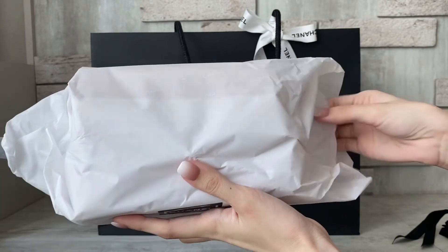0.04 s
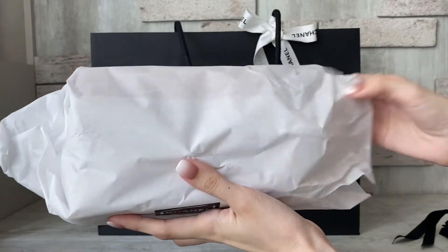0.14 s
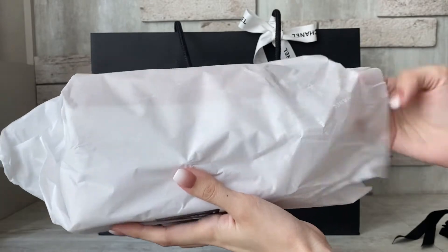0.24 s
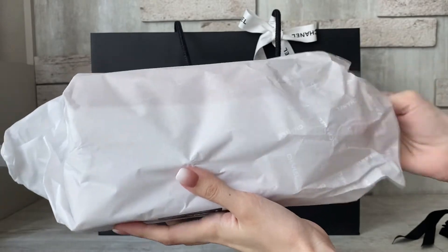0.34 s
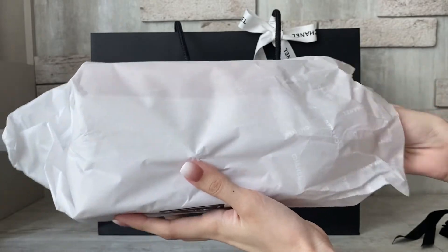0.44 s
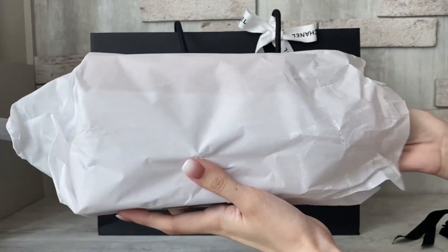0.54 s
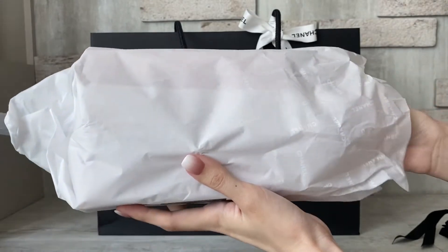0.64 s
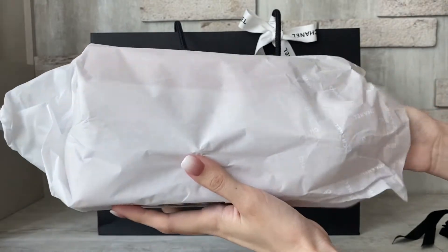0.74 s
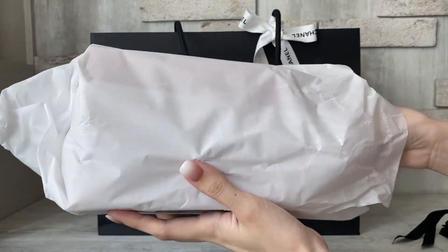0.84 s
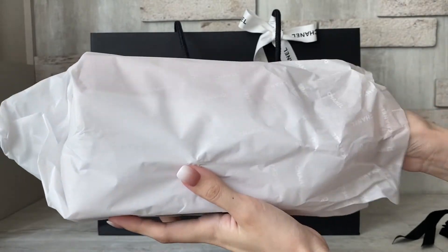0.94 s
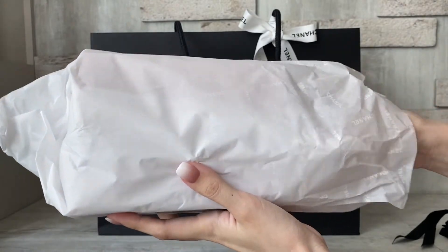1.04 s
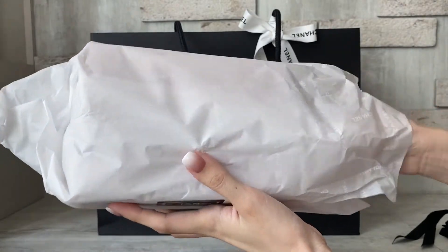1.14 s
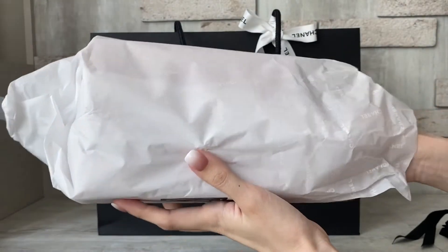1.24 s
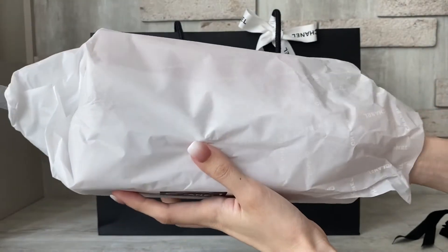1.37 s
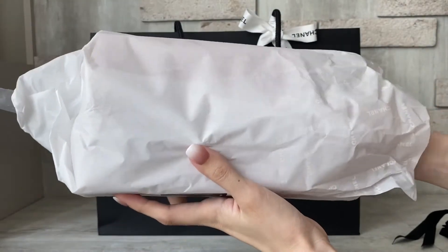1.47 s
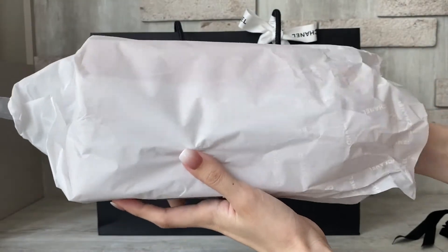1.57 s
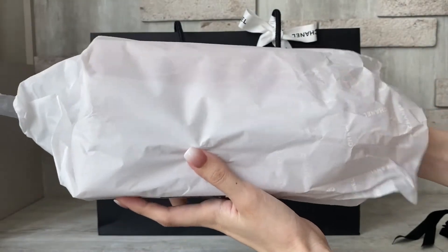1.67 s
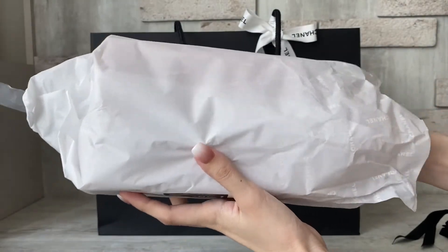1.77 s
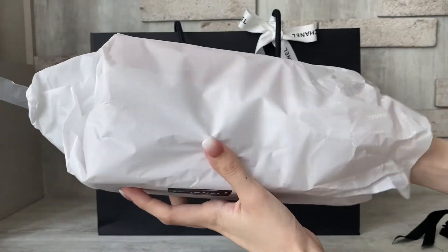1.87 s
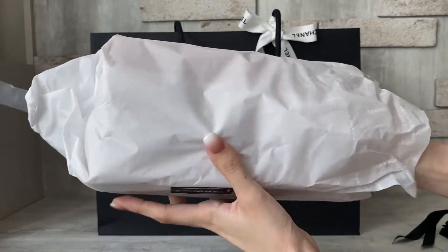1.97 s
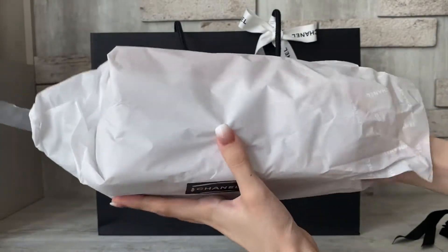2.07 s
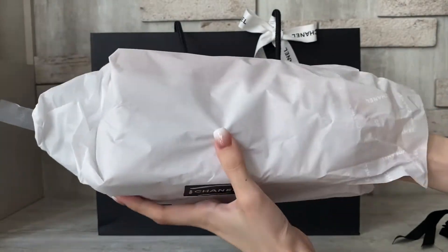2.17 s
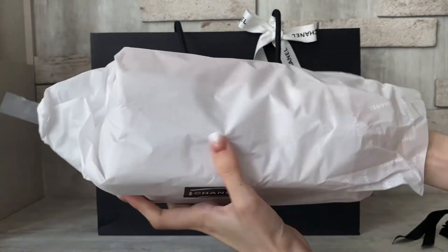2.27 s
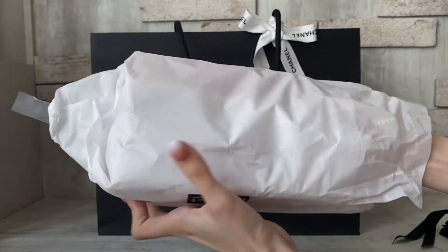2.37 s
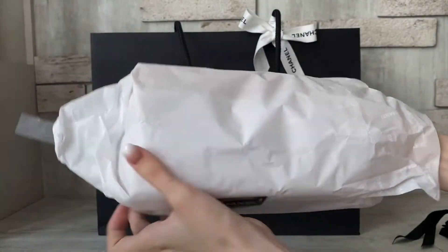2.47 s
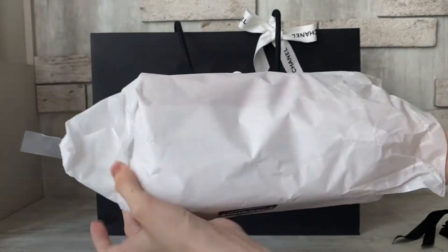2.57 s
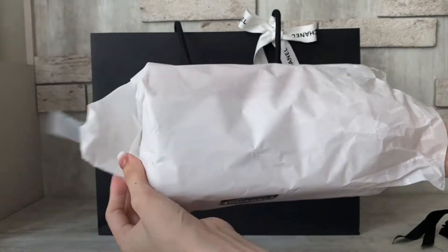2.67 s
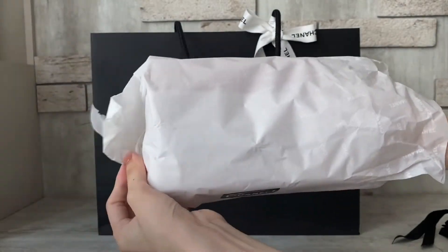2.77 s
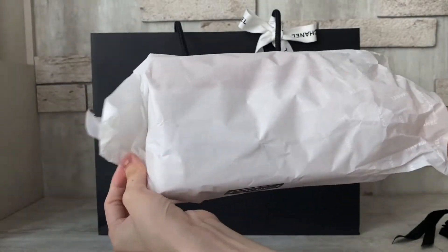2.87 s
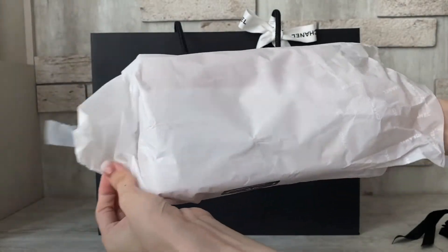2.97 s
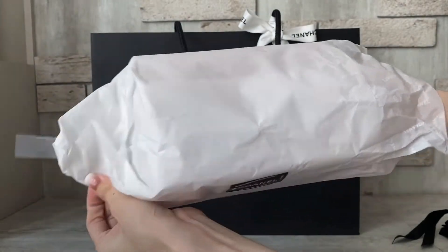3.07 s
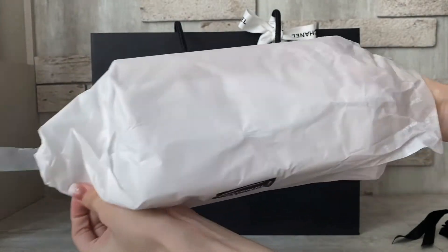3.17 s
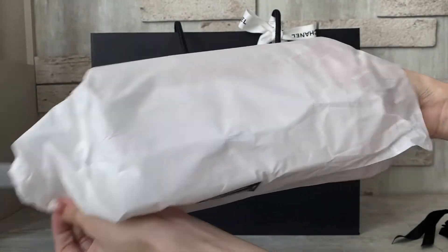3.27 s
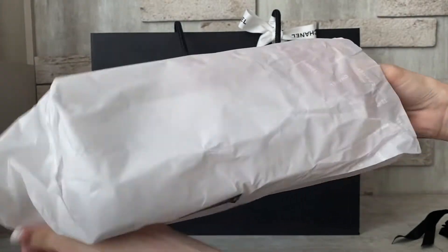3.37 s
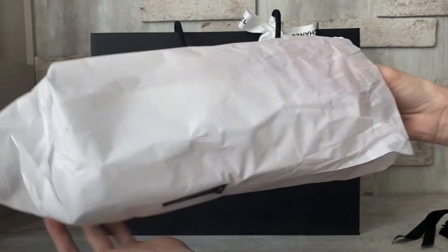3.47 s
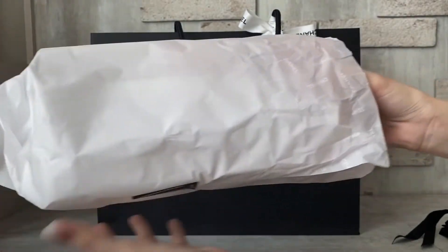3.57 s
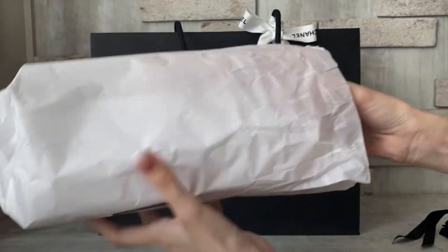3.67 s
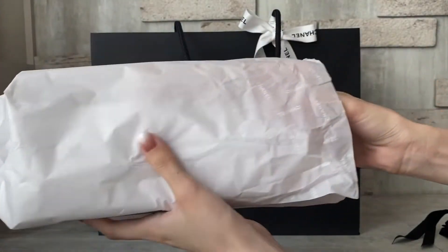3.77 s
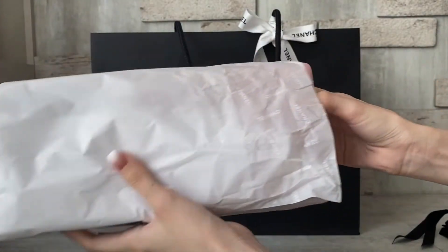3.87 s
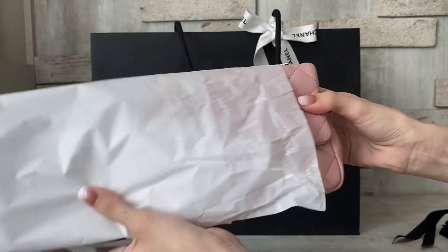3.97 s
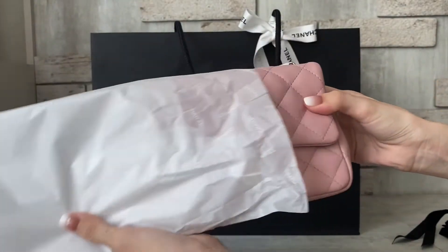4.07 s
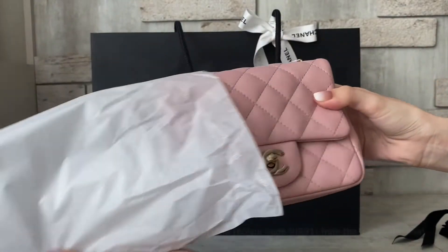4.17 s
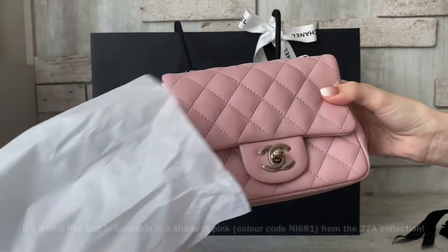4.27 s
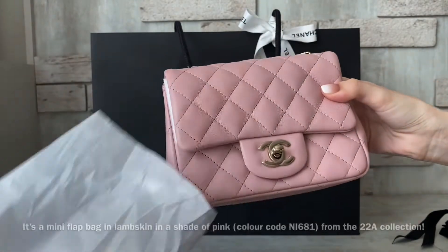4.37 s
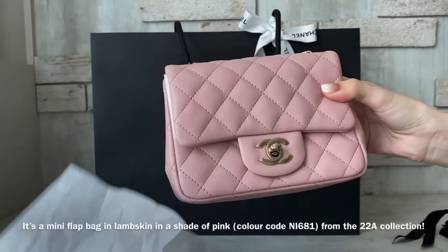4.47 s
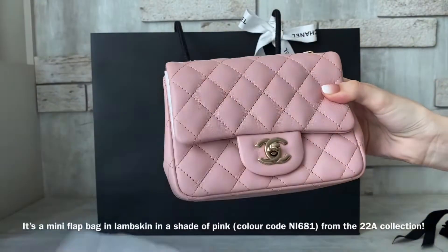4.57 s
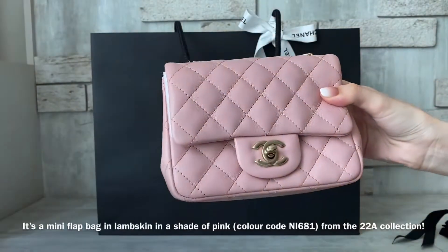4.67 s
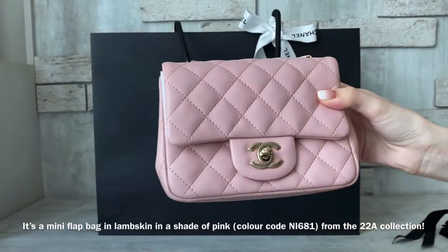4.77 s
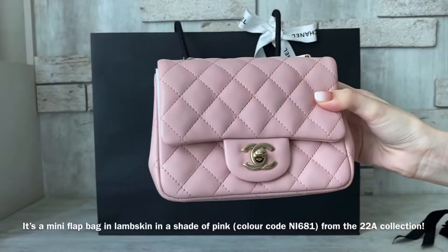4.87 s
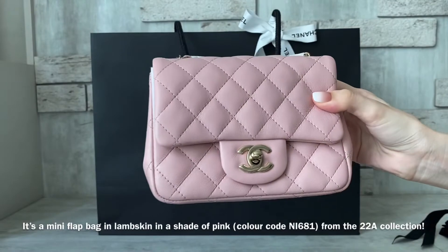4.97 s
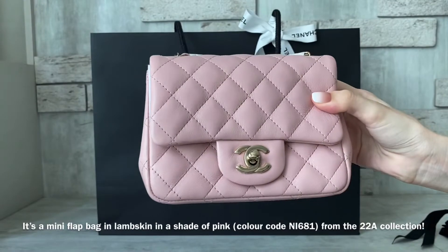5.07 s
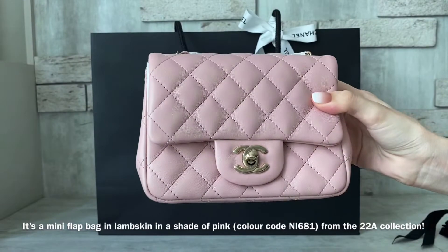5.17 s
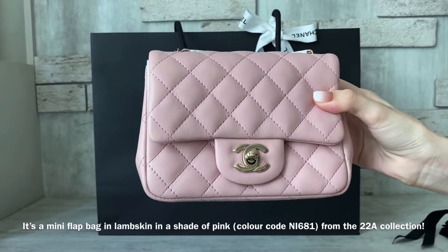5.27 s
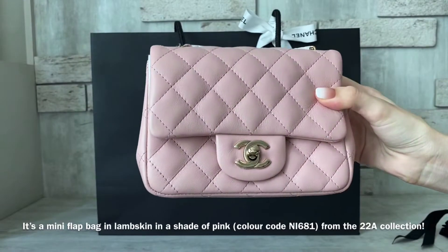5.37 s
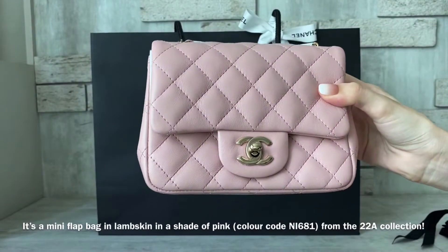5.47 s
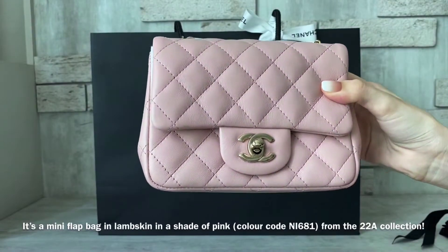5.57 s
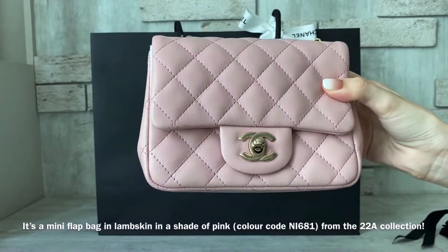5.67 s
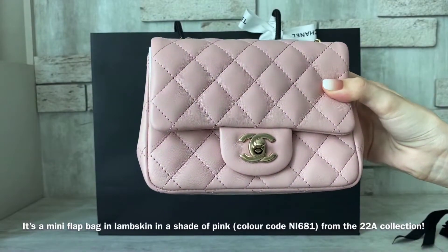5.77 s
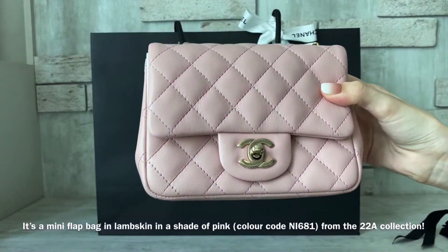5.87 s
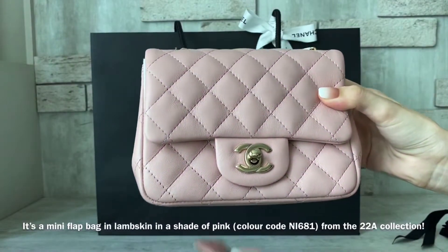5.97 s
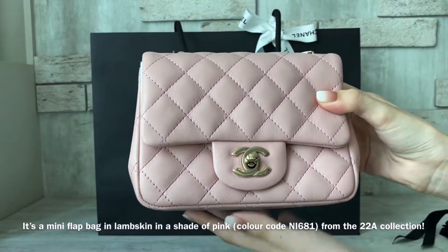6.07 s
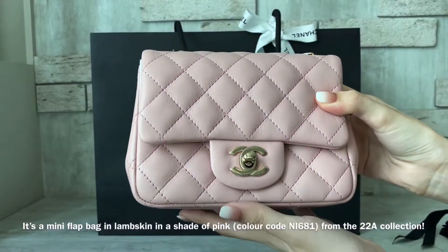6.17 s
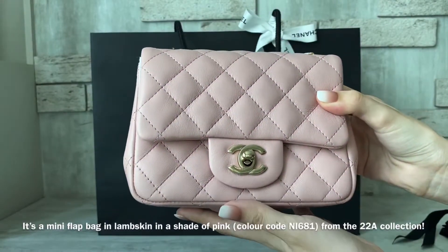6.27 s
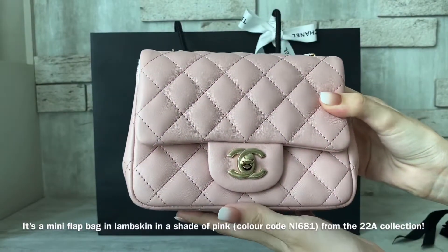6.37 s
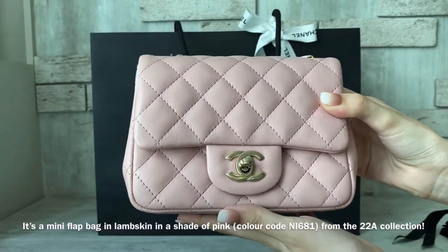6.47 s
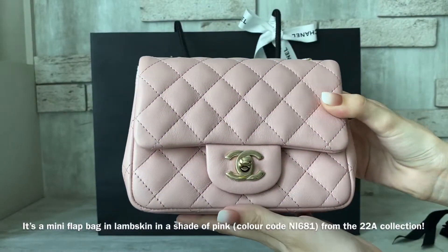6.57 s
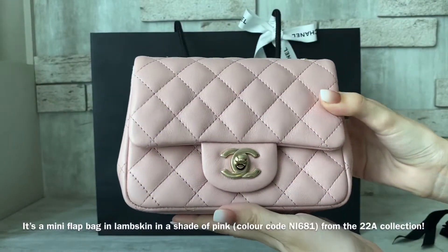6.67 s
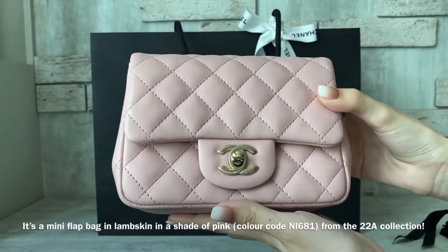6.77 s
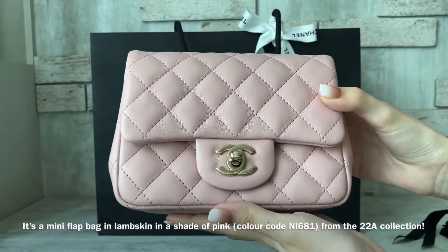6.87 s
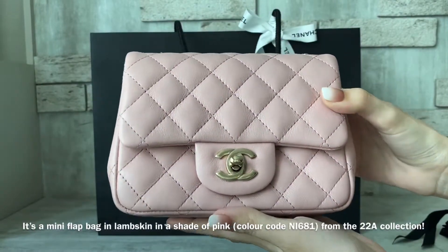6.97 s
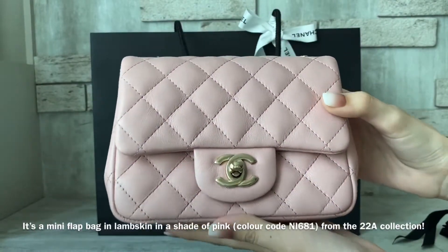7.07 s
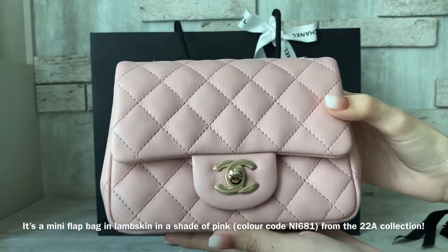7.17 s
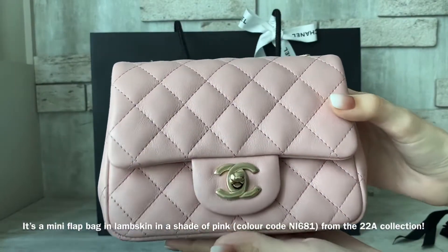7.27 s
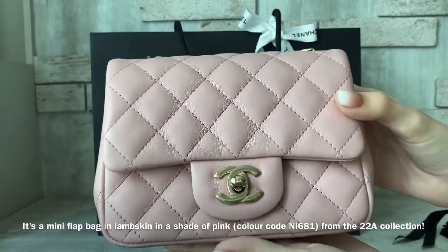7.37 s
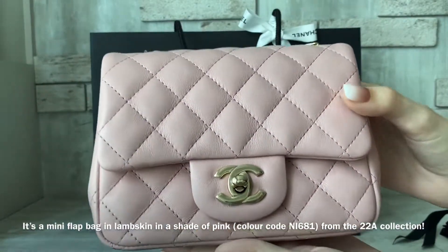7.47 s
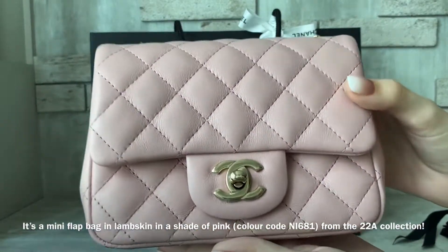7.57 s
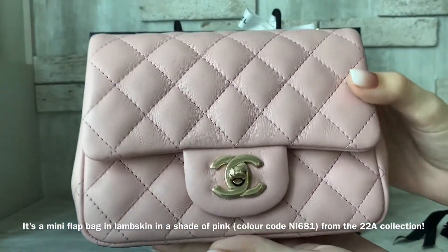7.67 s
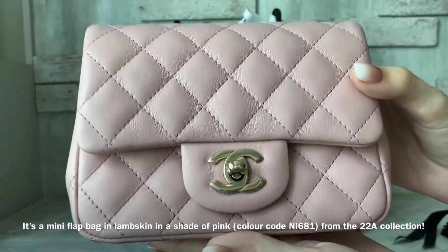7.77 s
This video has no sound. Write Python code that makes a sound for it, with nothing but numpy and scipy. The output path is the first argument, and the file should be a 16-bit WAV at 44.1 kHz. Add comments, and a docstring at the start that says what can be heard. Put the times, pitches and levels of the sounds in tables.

```python
"""Tissue paper crackles as a handbag is slid out of its sleeve, close to the microphones in a small room.
Creases are swarms of tiny clicks passed through paper colours; the hollow sleeve rubs and flutters in filtered noise.
The paper is put down, then come faint ticks and one click of the bag's fittings, made of ringing modes.
Underneath lie a low room rumble of coloured noise and a faint, wavering sine hum."""
import sys
import numpy as np
from scipy import signal
from scipy.fft import rfft, irfft
from scipy.io import wavfile
from scipy.ndimage import uniform_filter1d

SR = 44100
rng = np.random.default_rng(int(sys.argv[2]) if len(sys.argv) > 2 else 0)


def to_wav(sig):
    """Store sig (one row per channel, or 1-D mono) as 16-bit WAV at the path in sys.argv[1].

    Samples outside -1..1 are clipped; the rate is SR.
    """
    pcm = np.clip(np.atleast_2d(sig), -1, 1) * 32767
    pcm = np.round(pcm).astype(np.int16)
    wavfile.write(sys.argv[1], SR, pcm.T)  # frames by channels


N = 345303
TIME = np.arange(N) / SR
BAND_EDGES = np.geomspace(120, 17000, 16)  # Hz

# Pulls on the paper: start_s, length_s, crackle_db (before layer trims), swell_db (rise over the pull),
# rub_db (sleeve relative to crackle)
PULLS = [(0.045, 0.11, -37, 13, -5), (0.22, 0.045, -39.5, 0, -5), (0.575, 0.092, -41.5, 10, -5),
         (0.728, 0.047, -37, 0, -5), (0.852, 0.15, -38.5, -3, -2.5), (1.062, 0.32, -41, 1, -3.5),
         (1.435, 0.05, -39.5, 2, -3), (1.645, 0.11, -49.5, 7, -0.5), (1.8, 0.07, -35.5, 0, -5.5),
         (1.955, 0.2, -44, -10, -3), (2.232, 0.033, -40, 0, -4), (2.33, 0.14, -45.5, 2, -3),
         (2.535, 0.21, -42.5, 4, -5.3), (2.858, 0.37, -37, 1, -3.5), (3.245, 0.052, -34, 1, -2),
         (3.345, 0.028, -37.5, -3, -0.7), (3.655, 0.105, -42, -1, -2), (3.825, 0.2, -38.5, 4, -2.5),
         (4.05, 0.32, -43, -8, -3.6), (4.47, 0.08, -57, 0.5, -3.5), (4.649, 0.094, -62, 2.5, 0.5),
         (5.035, 0.09, -60, -3.5, -6), (5.227, 0.04, -54, 0, 2), (5.372, 0.035, -52, 0, -0.5),
         (5.535, 0.014, -51.5, 0, 2.5), (5.595, 0.046, -61, 0.5, -4)]
# How the sheet is held: time_s, billow_db (air flutter, before trim), brightness_db_per_octave (of the creases)
SHEET_HOLD = [(0, 4, 0.5), (1.3, -0.5, -1), (2.3, 0, -2), (3.3, -3, 0), (3.75, -1.5, 1.5), (4.3, 0.5, 0.5),
              (4.8, -1, -2.8)]
# Single creases giving way: start_s, level_db (dry, over 5 ms), brightness_db_per_octave
SNAPS = [(0.0052, -36.5, -0.5), (0.022, -41, 1.5), (0.0558, -30, 1), (0.0988, -29, 1), (0.16, -30.5, 3),
         (0.2204, -30, 2), (0.2672, -39, 11), (0.368, -44.5, 0), (0.4615, -42, -1.5), (0.5644, -48, 1),
         (0.7427, -35, -2.5), (0.8496, -32.5, 3), (0.9443, -28, -2.5), (1.0054, -34, -5),
         (1.2022, -33.5, 0.5), (1.3697, -33, -1.5), (1.565, -44.5, -1), (1.6466, -41, -1),
         (1.6846, -32.5, -0.5), (1.7111, -38, 5.5), (1.7506, -35.5, -0.5), (2.0061, -35, 3),
         (2.1625, -42, 2), (2.4588, -31.5, 8), (2.512, -37.5, -1.5), (2.5944, -35, 6.5), (2.7933, -33.5, 3),
         (2.8241, -35.5, 1.5), (2.961, -31, 1.5), (3.032, -36, 11), (3.569, -46.5, 2.5), (3.6597, -37, -3),
         (3.8054, -37, -1), (3.961, -34.5, -3.5), (4.284, -33, 18), (4.4775, -50, 1), (4.5227, -42.5, -1),
         (4.733, -47, 1), (4.8915, -58, -4), (4.951, -54, 2), (4.993, -48, 1), (5.0327, -49.5, -3.5),
         (5.37, -52, -0.5), (5.412, -46.5, 9), (5.921, -55.5, -3), (5.937, -62, 6), (6.2162, -60.5, -3.5),
         (6.25, -67, 1), (6.5219, -59, -8), (6.6323, -65.5, -6)]
# Contacts of the fitting's click: start_s, level_db (drive into its modes)
CLICK_CONTACTS = [(6.7033, -35), (6.7058, -43)]
# Ringing modes of the fitting: pitch_hz, level_db (relative), t60_s
FITTING_MODES = [(347, -15.5, 0.036), (606, -7.5, .02), (958, -11, 0.027), (1244, -10.5, 0.023),
                 (1790, 1, 0.011), (2430, -4.5, 0.0065), (3800, -11, .006), (4700, -10.5, 0.0054),
                 (6900, -18.5, .005), (10800, -12, 0.0018)]
# Stereo position, led by the paper: time_s, left_minus_right_db
STEREO_POSITION = [(0, -2), (2, -1), (4.2, 1.3), (5.5, -1)]

# Colour of buckling creases: frequency_hz, density_db (relative, per Hz)
CRACKLE_COLOUR = [(200, -22), (900, -8), (2000, -4.5), (3200, -1), (4500, 0), (5500, -3.5), (7200, 0),
                  (11800, 0), (14000, -2.5), (16000, -11)]
# Colour of the rubbing sleeve: frequency_hz, density_db (relative, per Hz)
SLEEVE_COLOUR = [(150, -18), (300, -15), (470, 0.5), (620, -3.5), (800, -1), (1000, -2.5), (1350, 1.5),
                 (1850, -4), (2500, -15), (4000, -17), (9000, -35.5)]
# Colour of the air pushed by the sheet: frequency_hz, density_db (relative, per Hz)
FLUTTER_COLOUR = [(30, -19), (55, -8), (75, -1), (120, -6), (180, -7), (280, -6), (450, -8), (900, -30)]
# Colour of the building's rumble: frequency_hz, density_db (relative, per Hz)
RUMBLE_COLOUR = [(15, -44), (25, -16.5), (37, -13.5), (59, -3), (88, -10.5), (131, -17.5), (243, -17),
                 (278, -18.5), (318, -25), (462, -21), (515, -25), (856, -30.5), (1000, -28.5), (2020, -48),
                 (15000, -69.5)]

# Sag of the hum near the end: time_s, pitch_hz (before wavering)
HUM_PITCH = [(6.5, 286.5), (7.1, 276)]
# Swells of the hum: start_s, length_s, level_db (before wavering and stereo weights)
HUM_SWELLS = [(3.45, 1.2, -64), (6.501, 0.17, -64.5), (7.002, 0.41, -64), (7.699, 0.13, -62.5)]
# Decay of the room: frequency_hz, t60_s
ROOM_DECAY = [(200, .5), (1000, 0.54), (4000, 0.57), (8000, 0.51), (15000, 0.42)]
# Left-right correlation of the stereo image: frequency_hz, likeness (no unit, limited to +-0.99 in use)
STEREO_LIKENESS = [(50, 1), (420, 0.63), (600, 0.14), (780, -0.44), (1200, 0.42), (2050, 0.7), (2650, 0.01),
                   (4800, .5), (6800, 0.48), (8400, -1.01), (10300, 0.68), (11400, 1.2), (12800, -0.87),
                   (13800, -1.53), (15200, 1.7)]
# Tonal balance of the stereo image: frequency_hz, left_minus_right_db
STEREO_BALANCE = [(100, 1.5), (430, 0), (950, 6), (1400, 3), (2300, -2), (3200, 4), (4500, 5), (6000, 1.5),
                  (8500, 0.5)]

# Every pull takes hold, lets go, and leaves the sheet settling faintly
GRIP_DB_PER_S, LET_GO_DB_PER_S = 700, 500
SETTLE_DB, SETTLE_DB_PER_S = -19, 85
# The paper sticks and slips during a pull
JERK_DB, JERKS_PER_S = 1.0, 28
# The sheet stirs faintly until it is put down (levels before layer trims)
STIR_CRACKLE_DB, STIR_RUB_DB, PUT_DOWN_S = -70, -65.5, 5.63
SNAP_HALF_RUN_S = 0.0036  # the last clicks of a snap come at up to twice this
RUMBLE_DB = -56.5
HUM_QUIET_DB, HUM_FADE_DB_PER_S = -76.5, 61
CUTOFF_HZ = 15900


def from_db(db):
    """Decibels to gain."""
    return 10 ** (np.asarray(db) / 20)


def rms_one(x):
    """Scale to unit power."""
    return x / np.sqrt(np.mean(x ** 2) + 1e-20)


def in_time(rows):
    """Each column of a curve, at every sample."""
    times, *columns = np.transpose(rows)
    return [np.interp(TIME, times, column) for column in columns]


def at_hz(points, hz):
    """Read a table on a log-frequency axis."""
    table_hz, values = np.transpose(points)
    return np.interp(np.log(hz + 1), np.log(table_hz), values)


def drift(rate):
    """A slow random wander of spread 1, with a new target rate times a second."""
    knots = rng.standard_normal(N // 20)
    return rms_one(np.interp(TIME * rate, np.arange(len(knots)), knots))


def held_db(start, length, attack_db_per_s, release_db_per_s):
    """Attack, hold and release as straight lines in dB, at 0 dB during the hold."""
    before_db = attack_db_per_s * np.maximum(start - TIME, 0)
    after_db = release_db_per_s * np.maximum(TIME - start - length, 0)
    return -np.minimum(before_db + after_db, 200)


def response(gain_at, size=4096):
    """The causal (minimum-phase) impulse response with a given gain per frequency."""
    hz = np.arange(size // 2 + 1) * SR / size
    cepstrum = irfft(np.log(gain_at(hz) + 1e-9))
    # folding the cepstrum forward puts the energy as early as it can be
    cepstrum[1:size // 2] *= 2
    cepstrum[size // 2 + 1:] = 0
    return irfft(np.exp(rfft(cepstrum)))


def through(x, impulse):
    """Pass a signal through an impulse response."""
    return signal.oaconvolve(np.atleast_2d(x), np.atleast_2d(impulse), axes=-1)[:, :N]


def coloured(x, spectrum):
    """Give a white signal a spectrum, keeping its power."""
    impulse = response(lambda hz: from_db(at_hz(spectrum, hz)))
    return through(x, impulse / np.linalg.norm(impulse))


def bands():
    """Band-passes about half an octave wide, with their centres in Hz."""
    edges = zip(BAND_EDGES, BAND_EDGES[1:])
    return [(np.sqrt(low * high), signal.butter(2, [low, high], "band", fs=SR, output="sos"))
            for low, high in edges]


def handling():
    """Drive in dB of crackle and rubbing: each pull swells or slackens in small jerks, then the sheet settles."""
    in_hand_db = held_db(0, PUT_DOWN_S, GRIP_DB_PER_S, LET_GO_DB_PER_S)
    crackle_db = STIR_CRACKLE_DB + in_hand_db
    rub_db = STIR_RUB_DB + in_hand_db
    for start, length, db, swell_db, relative_rub_db in PULLS:
        progress = np.clip((TIME - start) / length, 0, 1)
        pull_db = held_db(start, length, GRIP_DB_PER_S, LET_GO_DB_PER_S)
        settle_db = SETTLE_DB + held_db(start, length, GRIP_DB_PER_S, SETTLE_DB_PER_S)
        level_db = db + swell_db * (progress - .5) + np.maximum(pull_db, settle_db)
        crackle_db = np.maximum(crackle_db, level_db)
        rub_db = np.maximum(rub_db, level_db + relative_rub_db)
    jerks_db = JERK_DB * drift(JERKS_PER_S)
    return crackle_db + jerks_db, rub_db + jerks_db


def swarm(per_s, spread_db, clump_db, clumps_per_s, even_s):
    """Creases buckle in avalanches, many small and few large; unit power over the longer run."""
    sizes_db = spread_db * np.minimum(rng.exponential(1, N), 6) + clump_db * drift(clumps_per_s)
    clicks = from_db(sizes_db) * (rng.random(N) < per_s / SR)
    running_power = uniform_filter1d(clicks ** 2, int(even_s * SR) + 1)
    return clicks / np.sqrt(np.abs(running_power) + 1e-6)


def facets(clicks, colour_db, patchy_db, tilt_db=0):
    """Each click shakes a facet of paper with its own colour; the mix of facets shifts as the sheet bends."""
    at, out = np.flatnonzero(clicks), 0
    for hz, band in bands():
        kicks = np.full((2, N), 1e-18)
        own_db = colour_db * rng.standard_normal(len(at)) + patchy_db * drift(30)[at]
        own_colour = rms_one(from_db(own_db))
        kicks[:, at] = clicks[at] * own_colour * rng.choice([-1, 1], (2, len(at)))
        brightness = from_db(tilt_db * np.log2(hz / 7000))
        out = out + signal.sosfilt(band, kicks) * brightness
    return out


def taut_facets(clicks, t60, order=768):
    """A facet pulled taut rings for a moment at its own pitch, with the power of its click."""
    at, t, out = np.flatnonzero(clicks), TIME[:order], np.zeros((2, N + order))
    for start, (pitch, *phase) in zip(at, rng.random((len(at), 3))):
        hz = 900 + 13000 * pitch ** 1.3
        ping = np.sin(2 * np.pi * (hz * t + np.array(phase)[:, None]))
        ping = ping * from_db(-60 * t / t60)
        out[:, start:start + order] += clicks[start] * ping / np.linalg.norm(ping, axis=1, keepdims=True)
    return out[:, :N]


def crackle(crackle_db, bright_db):
    """Faster handling breaks more creases a second; a fine hiss of sliding fibres lies under them."""
    per_s = 1200 + 2200 * from_db(.6 * (crackle_db + 40))
    fine = swarm(per_s, spread_db=1.5, clump_db=2.0, clumps_per_s=300, even_s=0.046)
    # now and then a stiffer fold snaps out of the swarm
    folds = swarm(per_s / 30, spread_db=0.5, clump_db=6.0, clumps_per_s=18, even_s=0.072)
    creases = facets(fine + from_db(-8.0) * folds, colour_db=4.5, patchy_db=2.0, tilt_db=bright_db)
    taut = swarm(per_s / 12, spread_db=3.0, clump_db=1.5, clumps_per_s=60, even_s=0.11)
    pings = taut_facets(taut, t60=0.024)
    fibres = from_db(-15.0) * rng.standard_normal((2, N))
    mix = creases + from_db(-7.5) * pings + fibres
    return from_db(crackle_db - 1.2) * coloured(mix, CRACKLE_COLOUR)


def sleeve(rub_db, billow_db):
    """Larger panels of the hollow sleeve catch and slip on the leather, and the whole sheet pushes air."""
    catches = swarm(1500, spread_db=2.0, clump_db=2.5, clumps_per_s=120, even_s=0.064)
    slips = facets(catches, colour_db=3.0, patchy_db=2.0)
    air = from_db(billow_db - 5) * coloured(rng.standard_normal((2, N)), FLUTTER_COLOUR)
    return from_db(rub_db - 1.5) * (coloured(slips, SLEEVE_COLOUR) + air)


def background():
    """Low rumble of the building and the wavering hum of a far motor."""
    rumble = from_db(RUMBLE_DB) * coloured(rng.standard_normal((2, N)), RUMBLE_COLOUR)
    hz, = in_time(HUM_PITCH)
    swells_db = [db + held_db(start, length, HUM_FADE_DB_PER_S, HUM_FADE_DB_PER_S)
                 for start, length, db in HUM_SWELLS]
    hum_db = np.maximum(HUM_QUIET_DB, np.max(swells_db, axis=0))
    phase = 2 * np.pi * np.cumsum(hz + 2.57 * drift(12)) / SR
    hum = from_db(hum_db + 3.0 * drift(13)) * np.sin(phase)
    return rumble + hum * np.array([[1.3], [.3]])  # weights into mid and side


def snaps(shake_db, evenness, lead_s=.002, size=40, order=1024):
    """A crease gives way as a run of clicks that swells and fades, shaking the sleeve as well."""
    out = np.zeros((2, N + 2 * order))
    chances = rng.random((len(SNAPS), size))
    kicks = rng.choice([-1, 1], (len(SNAPS), 2, size))
    paper = lambda hz: from_db(at_hz(CRACKLE_COLOUR, hz)) + from_db(at_hz(SLEEVE_COLOUR, hz) + shake_db)
    for (s, db, tilt_db), chance, kick in zip(SNAPS, chances, kicks):
        progress = (np.arange(size) + chance) / size
        delay_s = lead_s + (progress + progress ** 4) * SNAP_HALF_RUN_S  # the last clicks straggle
        burst = np.zeros((2, order))
        at = np.clip(delay_s * SR, 0, order - 1).astype(int)
        burst[:, at] = kick * np.sqrt(np.sin(np.pi * progress))
        # peaks and dips in the run's spectrum are partly levelled, for a drier, less coloured snap
        spectrum = rfft(burst)
        burst = irfft(spectrum / (np.abs(spectrum) + 1e-9) ** min(evenness, 1))
        tilt = lambda hz: from_db(tilt_db * np.log2(np.maximum(hz, 1000) / 4000))
        sound = through(burst, response(lambda hz: paper(hz) * tilt(hz), size=order))
        # unit power if its energy is spread over 5 ms
        sound = sound * np.sqrt(.005 * SR / np.sum(sound ** 2, axis=1, keepdims=True))
        start = max(int((s - lead_s) * SR), 0)
        out[:, start:start + sound.shape[1]] += from_db(db) * sound
    return out[:, :N]


def fitting():
    """A small hard part of the bag knocks and rebounds, its ringing modes damped by the leather."""
    clicks, out = np.full(N, 1e-18), 0
    for s, db in CLICK_CONTACTS:
        clicks[int(s * SR)] = from_db(db)
    for k, (hz, db, t60) in enumerate(FITTING_MODES):
        radius = from_db(-60 / (t60 * SR))  # decay per sample
        angle = 2 * np.pi * hz / SR
        feedback = [1, -2 * radius * np.cos(angle), radius * radius]
        ringing = signal.lfilter([0, np.sin(angle)], feedback, clicks)
        out = out + (-1) ** k * from_db(db) * ringing
    return out * np.array([[1], [.4]])  # weights into mid and side


def room(x, first_echo_s):
    """Dense reflections build up after the nearest wall answers, and die soonest in the treble."""
    t, tail = TIME[:SR * 2 // 3], 0
    for hz, band in bands():
        fade = from_db(-60 * t / at_hz(ROOM_DECAY, hz))
        tail = tail + signal.sosfilt(band, rng.standard_normal((2, len(t)))) * fade
    tail = tail * np.clip(t / first_echo_s - 1, 0, 1)
    return through(x, tail / np.linalg.norm(tail, axis=1, keepdims=True))


def moving_room(x, moves_per_s, count=5):
    """As the source moves, one pattern of reflections passes into the next, round a cycle."""
    turns = moves_per_s * TIME - np.arange(count)[:, None] / count
    weights = np.maximum(np.cos(2 * np.pi * turns), 0)
    weights = weights / np.linalg.norm(weights, axis=0)
    return sum(room(x * weight, first_echo_s=0.0015) for weight in weights)


def stereo_image(field):
    """The sound is spread between left and right by frequency, through a mid and a side signal."""
    alike = lambda hz: np.clip(at_hz(STEREO_LIKENESS, hz), -.99, .99)
    mid = through(field[0], response(lambda hz: np.sqrt((1 + alike(hz)) / 2)))
    side = through(field[1], response(lambda hz: np.sqrt((1 - alike(hz)) / 2)))
    left = through(mid + side, response(lambda hz: from_db(at_hz(STEREO_BALANCE, hz) / 2)))
    right = through(mid - side, response(lambda hz: from_db(-at_hz(STEREO_BALANCE, hz) / 2)))
    return np.vstack([left, right])


def scene():
    """Paper and bag in the room; the stereo image leans right, drifts to the left, then comes part way back."""
    crackle_db, rub_db = handling()
    billow_db, bright_db = in_time(SHEET_HOLD)
    paper = crackle(crackle_db, bright_db) + sleeve(rub_db, billow_db) + snaps(shake_db=-2.5, evenness=0.39)
    click = fitting()
    # the paper is carried away from the microphones, so more of it arrives by the walls
    wet = from_db(np.interp(TIME, [4.3, 4.8], [-5.5, -2]))
    echoes = moving_room(wet * paper + from_db(-11.5) * click, moves_per_s=1.4)
    stereo = stereo_image(paper + click + echoes + background())
    left_minus_right_db, = in_time(STEREO_POSITION)
    return stereo * from_db(left_minus_right_db * np.array([[.5], [-.5]]))


def record(dry, top=0.2):
    """The highest peaks are rounded and the treble is cut steeply."""
    rounded = top * np.tanh(dry / top)
    lowpass = signal.ellip(10, .1, 70, CUTOFF_HZ, fs=SR, output="sos")
    return signal.sosfilt(lowpass, rounded)


dry = scene()
out = record(dry)
to_wav(out)
```